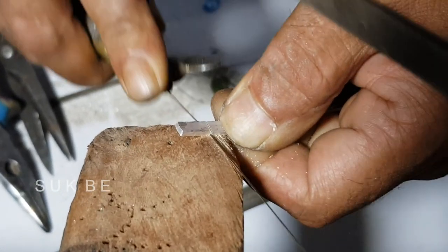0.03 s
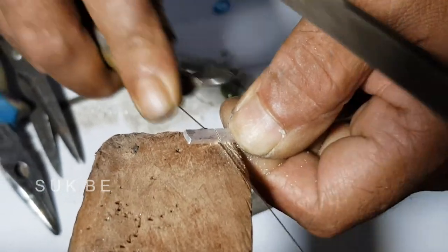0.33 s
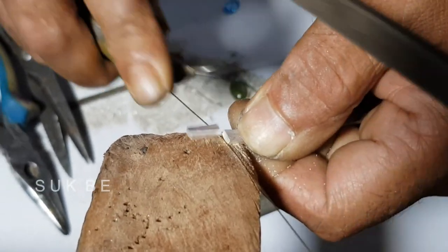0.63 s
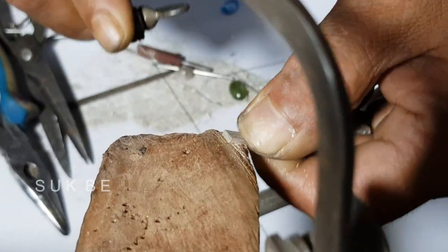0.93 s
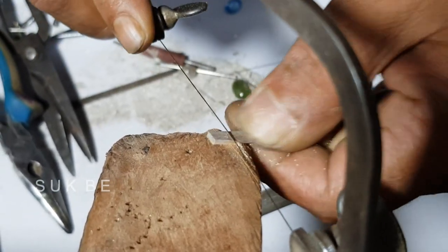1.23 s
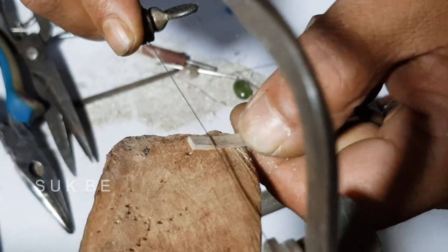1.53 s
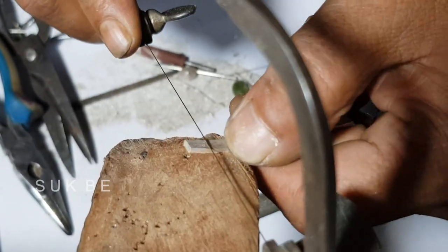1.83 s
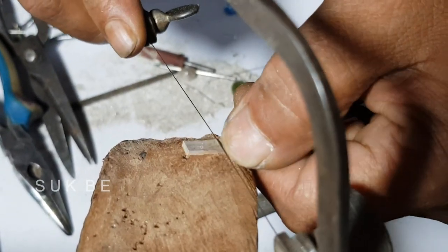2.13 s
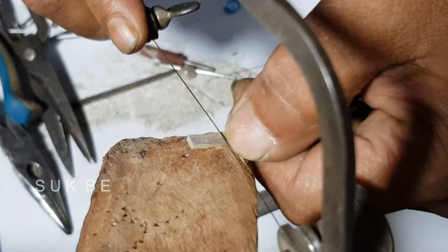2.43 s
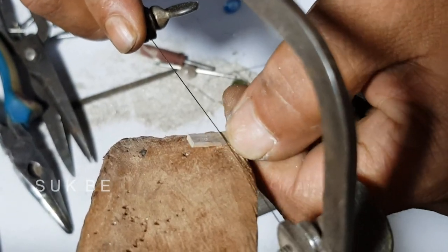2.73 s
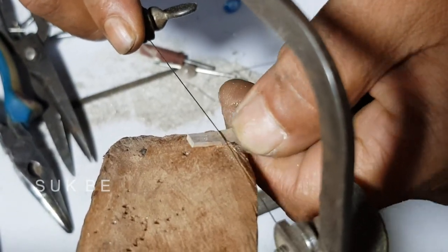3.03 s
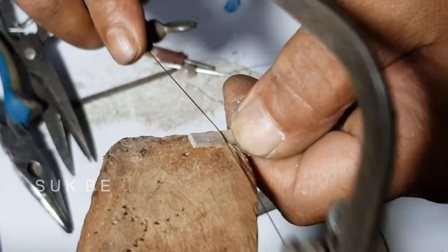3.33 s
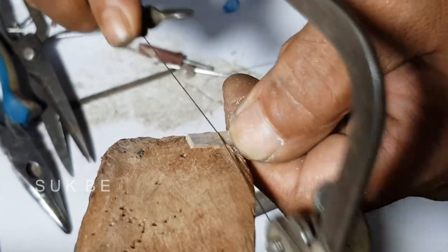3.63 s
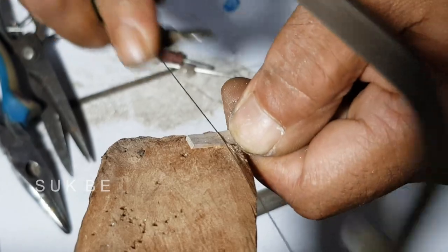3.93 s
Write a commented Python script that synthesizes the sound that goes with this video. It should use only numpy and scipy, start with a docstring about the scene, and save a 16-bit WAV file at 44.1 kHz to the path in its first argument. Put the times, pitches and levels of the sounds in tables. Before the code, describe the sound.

A fine hand saw rasps through a small metal strip on a wooden bench pin, close by in a small room. After several quick strokes the saw knocks the wood, faint scuffs fill a pause, and sawing resumes.

```python
"""Sawing metal at a jeweller's bench

A fine saw cuts a metal strip on a wooden bench pin, close by in a small room. Blade speed sets the tooth
rate, so each stroke buzzes up and down in pitch as the teeth rasp, catch and shake the bench.
The saw knocks on the pin; in a pause the strip is shifted and the blade reseated, then sawing resumes."""
import sys
import numpy as np
from scipy import signal
from scipy.fft import rfft, irfft, next_fast_len
from scipy.io import wavfile
from scipy.ndimage import uniform_filter1d, map_coordinates

SR = 44100
rng = np.random.default_rng(int(sys.argv[2]) if len(sys.argv) > 2 else 0)


def transcribe(u):
    """Save the signal u as a 16-bit wav file named by the first command-line argument.

    u: samples, shape (n,) or (channels, n), limited to [-1, 1]; the rate is SR.
    q: integer samples, one column per channel.
    """
    v = np.clip(np.atleast_2d(u).T, -1, 1)
    q = np.round(v * 32767).astype(np.int16)
    wavfile.write(sys.argv[1], SR, q)


N = 176400

# Background spectra (frequency [Hz], level [dB])
RUMBLE_SPECTRUM = [(20, -21), (68, 5.5), (110, -2), (150, -10), (185, 7), (240, -10), (400, -20),
                   (650, -37), (4000, -60.5)]
AIR_LEFT = [(2200, -4), (4000, -10), (7300, -12.5), (9800, 2), (15500, -0.5)]
AIR_RIGHT = [(1900, -0.5), (2500, 7.5), (3600, -5), (4600, 7), (6200, -1), (7500, -18), (9500, -7),
             (12000, -1)]
# Course of the rumble (time [s], level [dB])
RUMBLE_LEVELS = [(0, -40.5), (1.001, -57), (2.552, -53)]
# Steady hiss (left level [dB], right level [dB])
AIR_LEVELS = [-70.5, -68.5]
# Resonances of pin and bench, strip, and saw (frequency [Hz], bandwidth [Hz], level [dB])
BENCH_MODES = [(102.6, 40, -9.5), (221.1, 15.8, 5.5), (300.6, 31, 0.5), (357.3, 24, -6.5), (522, 15, -21.5),
               (686, 25, -9.5)]
STRIP_MODES = [(1412, 162, 2), (2935, 960, -5.5), (11700, 7400, -19.5)]
SAW_MODES = [(3040, 150, 11.5), (4020, 27, 12.5), (4460, 60, 22.5), (5193, 55, 23.5)]
# The strip slides on the wood (start [s], duration [s], scuff level [dB], bench level [dB])
SHIFTS = [(0.995, 0.14, -62, -54), (1.228, 0.18, -72.5, -63.5), (1.41, 0.17, -63.5, -54.5),
          (1.638, 0.15, -66.5, -70), (1.763, 0.19, -67, -73), (1.926, 0.16, -74.5, -54),
          (2.182, 0.16, -103, -55.5)]
# Faint narrow tones while handling: the frame hums low, the rubbed saw squeaks high (start [s], duration [s],
# frequency [Hz], level [dB])
SQUEAKS = [(1.938, 0.11, 3110, -73), (1.953, .06, 5300, -65), (2.761, 0.26, 431, -64),
           (2.837, 0.17, 3113, -79), (3.11, 0.25, 447.5, -59.5)]
# The saw hits the pin (time [s], thud level [dB], clack level [dB], tick level [dB])
KNOCKS = [(0.85, -14.5, -23.5, -31), (0.8563, -19.5, -39, -64.5), (0.934, -35.5, -71, -41),
          (.977, -34, -39.5, -60)]
# Low modes of the wood, hard modes of pin and strip (frequency [Hz], level [dB], T60 [s])
THUD_MODES = [(122.9, -6, 0.068), (197.8, -19, 0.39), (244.2, 4.5, 0.093), (327, -5, 0.07),
              (366, -2.5, 0.051)]
CLACK_MODES = [(666, -1, 0.052), (1258, 3.5, 0.033), (1660, 13.5, 0.01)]
# Impact noise spectra (frequency [Hz], level [dB])
CLACK_SPECTRUM = [(500, 9.5), (1000, -3), (1600, -4.5), (2200, -4.5), (3900, -7.5), (6000, -17.5),
                  (16000, -82)]
TICK_SPECTRUM = [(6000, -7.0), (12000, -2.5), (16000, -1.5)]
# The blade snags or is nudged in its cut (time [s], level [dB])
SNAGS = [(0.327, -22), (0.532, -20), (0.647, -17), (1.201, -36), (2.52, -42), (3.023, -38), (3.311, -17.5),
         (3.32, -18), (3.384, -26), (3.432, -16.5), (3.7, -16), (3.892, -22), (3.738, -17.5)]
# Saw strokes (start [s], duration [s], peak tooth rate [Hz], buzz level [dB],
# buzz rise over the stroke [dB], judder level [dB], rasp level [dB], hiss level [dB])
STROKES = [(0.014, 0.14, 1155, -41.5, -20, -34.5, -46, -52),
           (0.18, 0.15, 1097, -35, 2.5, -33.5, -42.5, -48), (0.359, 0.14, 897.5, -41, 6, -41.5, -52, -57.5),
           (0.521, 0.14, 722, -30, 13.5, -36.5, -46.5, -52),
           (0.682, 0.12, 444, -48, -47.5, -50.5, -63.5, -67.5),
           (3.301, 0.14, 728.9, -35, -15.5, -28.5, -42, -58.5),
           (3.484, 0.142, 897.5, -46, -33, -30, -44.5, -55),
           (3.653, 0.15, 941.4, -40, 4, -31.5, -41.5, -53), (3.841, 0.11, 860, -46.5, -39, -29, -40, -51)]
# Tooth harmonics 1 to 3 at full speed (level [dB])
HARMONICS = [-0.5, -7.5, -11.5]
# Cutting spectra (frequency [Hz], level [dB])
BUZZ_SPECTRUM = [(120, -13.5), (210, 9), (380, 6), (530, -7), (715, 1), (1000, -11), (1330, 0),
                 (1900, -5.5), (4000, -20)]
RASP_SPECTRUM = [(300, -15.5), (950, 0.5), (1300, 7), (1850, -3), (2300, -5), (3100, -3), (4400, 1.5),
                 (5600, -4), (7200, -14.5), (16000, -60.5)]
HISS_SPECTRUM = [(3000, -46.5), (7000, 0.5), (9300, -4.5), (11500, 3), (13500, -7), (16000, -22)]
# Stereo balance (frequency [Hz], left minus right level [dB])
BALANCE = [(90, -3.5), (440, -7.5), (540, -0.5), (740, 0.5), (1200, -16), (3000, -8), (4400, -4.5),
           (6500, -7.5), (9000, 21), (15000, 11.5)]

TIME = np.arange(N) / SR

def amp(db):
    """Decibels express an amplitude ratio logarithmically."""
    return 10 ** (np.asarray(db) / 20)

def unit(x):
    """Normalisation sets the RMS to 1."""
    return x / np.sqrt(np.mean(x ** 2) + 1e-20)

def along(points, hz):
    """Interpolation on a logarithmic frequency axis."""
    freqs, values = np.transpose(points)
    return np.interp(np.log(hz + 1), np.log(freqs + 1), values)

def wobble(rate):
    """Smooth random modulation: a spline through `rate` knots a second."""
    return map_coordinates(rng.standard_normal(N), [TIME * rate], order=3)

def filtered(x, response):
    """Linear filtering multiplies the spectrum by a frequency response."""
    size = 2 * next_fast_len(N * 3 // 5)
    return irfft(rfft(x, size) * response(np.fft.rfftfreq(size, 1 / SR)), size)[..., :N]

def colour(x, spectrum):
    """Minimum-phase filtering shapes a spectrum causally, with unit energy."""
    def response(hz):
        cepstrum = irfft(np.log(amp(along(spectrum, hz))))
        cepstrum[1:len(cepstrum) // 2] *= 2
        cepstrum[len(cepstrum) // 2 + 1:] = 0
        gain = np.exp(rfft(cepstrum))
        return gain / np.sqrt(np.mean(abs(gain) ** 2))
    return filtered(x, response)

def resonate(x, modes):
    """Forced vibration: the responses of damped resonators superpose."""
    return filtered(x, lambda f: sum(amp(db) * 1j * f * width / (hz * hz - f * f + 1j * f * width)
                                     for hz, width, db in modes))

def grit(rough_db, rate):
    """Random amplitude modulation gathers noise into clumps."""
    return unit(rng.standard_normal(N) * amp(rough_db * wobble(rate)))

def decay(start, t60):
    """Exponential decay from a sudden onset, 60 dB in t60 seconds."""
    age = TIME - start
    return (age >= 0) * amp(-60 * np.maximum(age, 0) / t60)

def arch(start, length, skew=1):
    """Half-sine envelope; a skew below 1 brings the peak forward."""
    progress = np.clip((TIME - start) / length, 0, 1) % 1
    return np.abs(np.sin(np.pi * progress ** skew))

def background():
    """Coherence: workshop rumble is nearly alike at both ears, the faint hiss independent."""
    level = amp(np.interp(TIME, *np.transpose(RUMBLE_LEVELS)))
    common = rng.standard_normal(N) * amp([[-3.5], [2.5]])
    rumble = colour(common + amp(-41.5) * rng.standard_normal((2, N)), RUMBLE_SPECTRUM)
    air = [amp(db) * colour(rng.standard_normal(N), spectrum)
           for db, spectrum in zip(AIR_LEVELS, (AIR_LEFT, AIR_RIGHT))]
    return level * rumble + np.array(air)

def reflections(x, t60):
    """Reverberation: convolution with decaying noise, different at each ear."""
    tail = rng.standard_normal((2, SR // 2)) * decay(0, t60)[:SR // 2]
    tail /= np.linalg.norm(tail, axis=1, keepdims=True)
    return signal.fftconvolve(x[None], tail, axes=1)[:, :N]

def bench(force, top_hz=640, low_hz=50):
    """Pin and bench answer a force through their modes, within a limited band."""
    band = lambda f: 1 / (1 + 1.3j * f / top_hz - (f / top_hz) ** 2) * 1j * f / (low_hz + 1j * f)
    return filtered(resonate(force, BENCH_MODES), lambda f: band(f) ** 2)

def soft_push(force, cutoff_hz=443):
    """A soft contact drives the bench with no treble."""
    return filtered(bench(force), lambda hz: np.exp(-(hz / cutoff_hz) ** 2))

def handling(squeak_width_hz=55):
    """Sliding friction excites strip and bench; the handled frame hums and the rubbed saw squeaks in narrow
    bands."""
    scuff = sum(amp(db) * arch(start, length) for start, length, db, _ in SHIFTS)
    scuff *= unit(resonate(grit(rough_db=4.5, rate=250), STRIP_MODES))
    rub = sum(amp(db) * arch(start, length) for start, length, _, db in SHIFTS)
    rub *= unit(soft_push(rng.standard_normal(N)))
    squeaks = 0
    for start, length, hz, db in SQUEAKS:
        tone = filtered(rng.standard_normal(N), lambda f: 1 / (1 + (2 * (f - hz) / squeak_width_hz) ** 2))
        squeaks += amp(db) * arch(start, length, skew=.65) * unit(tone)
    return scuff + rub + squeaks

def knocks(attack_s=0.0016, tail_t60=0.42):
    """Impact starts free vibration: a wooden thud, a hard clack and a steel tick."""
    t = np.arange(SR // 3) / SR
    struck = lambda modes: sum(amp(db - 60 * t / t60) * np.sin(2 * np.pi * hz * t)
                               for hz, db, t60 in modes)
    attack = 1 - np.exp(-t / attack_s)
    ringing, clack, tick = np.zeros(N + SR), 0, 0
    for start, thud_db, clack_db, tick_db in KNOCKS:
        vibration = amp(thud_db) * struck(THUD_MODES) + amp(clack_db) * struck(CLACK_MODES)
        ringing[round(start * SR):][:len(t)] -= attack * vibration
        clack += amp(clack_db) * (decay(start, t60=0.032) + amp(-19) * decay(start, tail_t60))
        tick += amp(tick_db) * (decay(start, t60=0.01) + amp(-29) * decay(start, tail_t60))
    clack_noise = colour(clack * rng.standard_normal(N), CLACK_SPECTRUM)
    tick_noise = colour(tick * rng.standard_normal(N), TICK_SPECTRUM)
    return ringing[:N] + clack_noise + tick_noise

def snags():
    """Stick-slip: a tooth holds and lets go, giving the bench an impulse."""
    jolts = np.zeros(N)
    for start, db in SNAGS:
        jolts[round(start * SR)] = amp(db)
    return soft_push(jolts) / np.abs(soft_push(signal.unit_impulse(N))).max()

def judder(strength, catches_per_s=477.3, spread_db=3, bend_s=.003):
    """Random catches drive the bench; changing hand pressure modulates the pitch of its ring."""
    catches = (rng.random(N) < catches_per_s / SR) * amp(spread_db * rng.standard_normal(N))
    catches *= np.sign(rng.standard_normal(N))
    shaking = bench(catches * strength)
    warped_samples = np.arange(N) + SR * bend_s * wobble(rate=22)
    return map_coordinates(shaking, [warped_samples], order=1) / np.std(bench(catches))

def sawing(spacing_jitter=.011, grip_db=3, tooth_size_db=2.2, pulse_depth=0.86, swell_s=.024):
    """Periodic excitation: tooth rate is proportional to blade speed; amplitudes follow its powers."""
    start, length, peak_hz, buzz_db, rise_db, judder_db, rasp_db, hiss_db = np.transpose(STROKES)
    stroke = np.maximum(np.searchsorted(start, TIME) - 1, 0)
    travel = np.clip((TIME - start[stroke]) / length[stroke], 0, 1)
    speed = np.abs(np.sin(np.pi * (travel % 1) ** 1.12)) ** 0.75  # fastest just after mid-stroke
    level = lambda db, power: amp(db)[stroke] * speed ** power
    swell = lambda db, power: uniform_filter1d(level(db, power), round(swell_s * SR))
    tooth_hz = peak_hz[stroke] * speed * (1 + spacing_jitter * wobble(rate=500))
    phase = 2 * np.pi * np.cumsum(tooth_hz) / SR
    # The grip varies within a stroke, and overtones weaken at low speed.
    teeth = sum(amp(db + grip_db * wobble(rate=39.57)) * speed ** (k - 1) * np.sin(k * phase)
                for k, db in enumerate(HARMONICS, 1))
    bite = amp(tooth_size_db * wobble(rate=220) + rise_db[stroke] * (travel - .5))
    buzz = filtered(teeth * bite * level(buzz_db, power=0.97), lambda hz: amp(along(BUZZ_SPECTRUM, hz)))
    shaking = judder(level(judder_db, power=0.31))
    pulses = 1 + pulse_depth * np.cos(phase)
    rasp = colour(grit(rough_db=2.5, rate=500) * pulses * swell(rasp_db, power=1.25), RASP_SPECTRUM)
    friction = grit(rough_db=3.5, rate=590) * pulses * swell(hiss_db, power=1.4)
    return buzz + shaking + rasp + colour(friction, HISS_SPECTRUM) + resonate(friction, SAW_MODES)

def scene(diffuse_hz=1075, left_lead_s=.0001):
    """Superposition of paths: bass arrives directly, treble mostly scattered by the bench top."""
    work = sawing() + snags() + knocks() + handling()
    treble = lambda hz: 1 - 1 / (1 + (hz / diffuse_hz) ** 6)
    direct = filtered(work, lambda hz: amp(-7.5 * treble(hz)))
    scattered = amp(2.5) * filtered(reflections(work, t60=.02), treble)
    room = amp(-7.5) * reflections(work, t60=0.25)
    def ears(hz):
        gains = amp(np.outer([.5, -.5], along(BALANCE, hz)))
        delays = np.exp(np.pi * left_lead_s * np.outer([1j, -1j], hz))
        return gains / gains.mean(axis=0) * delays
    return filtered(direct + scattered + room, ears) + background()

def record(dry, cutoff_hz=15780):
    """Band limiting: an ideal low-pass filter removes the highest treble."""
    return filtered(dry, lambda hz: hz < cutoff_hz)

dry = scene()
out = record(dry)
transcribe(out)
```